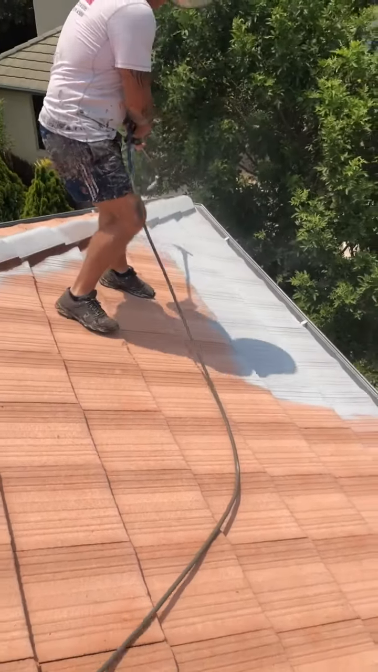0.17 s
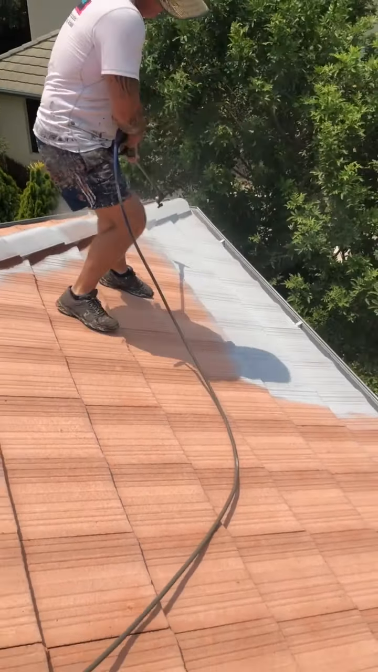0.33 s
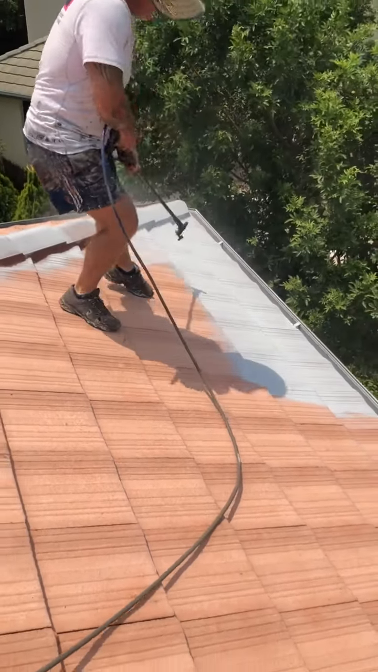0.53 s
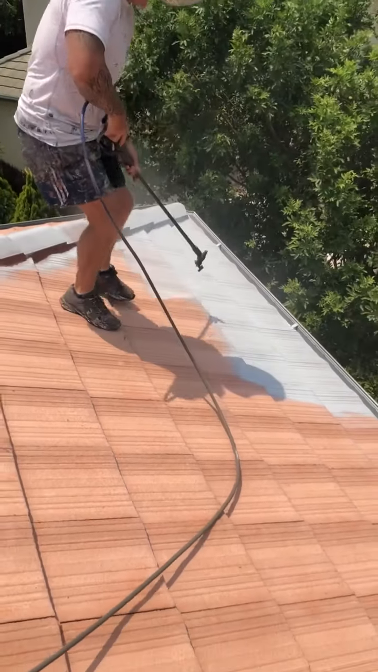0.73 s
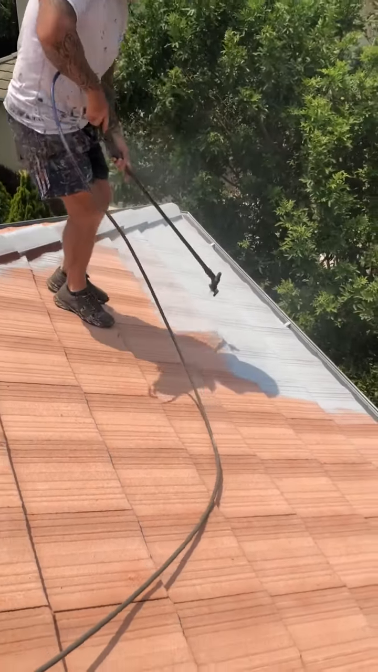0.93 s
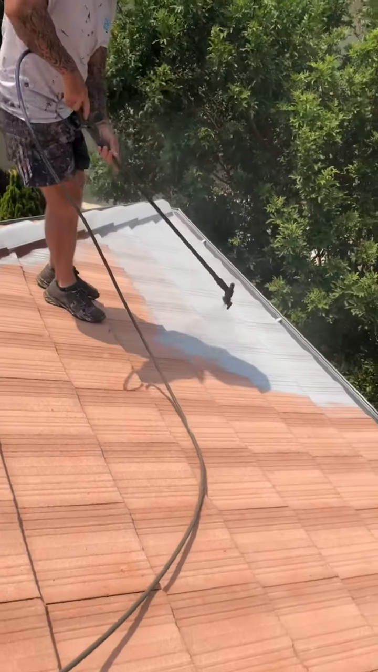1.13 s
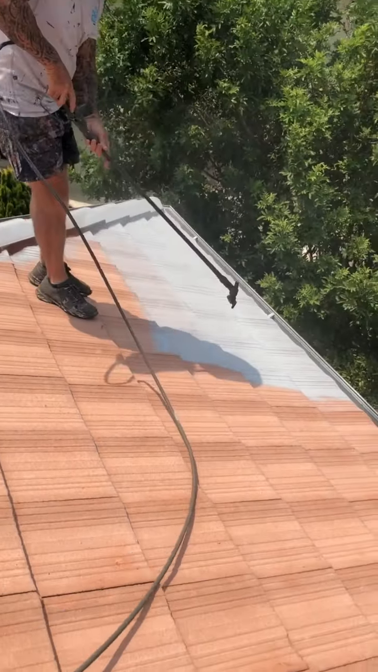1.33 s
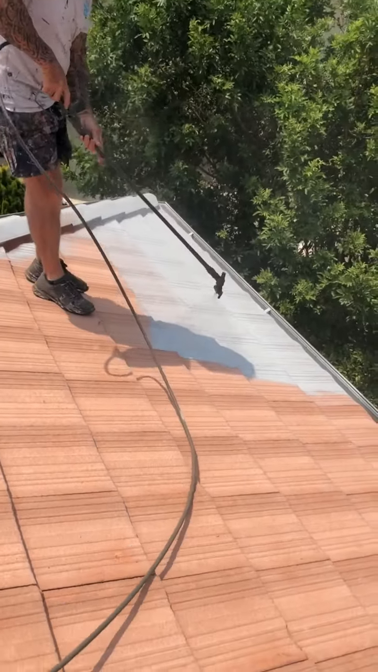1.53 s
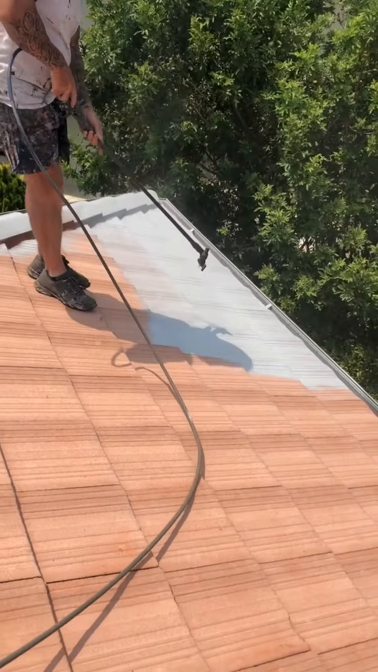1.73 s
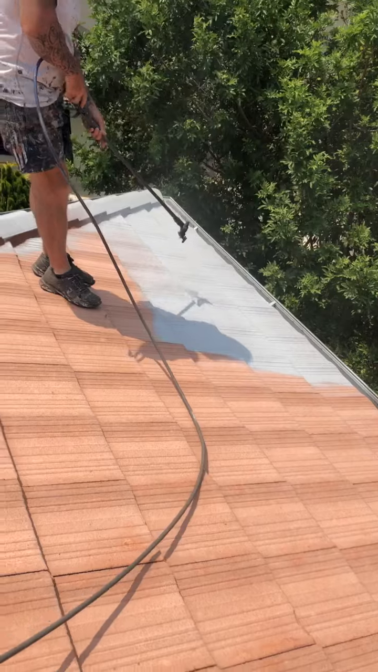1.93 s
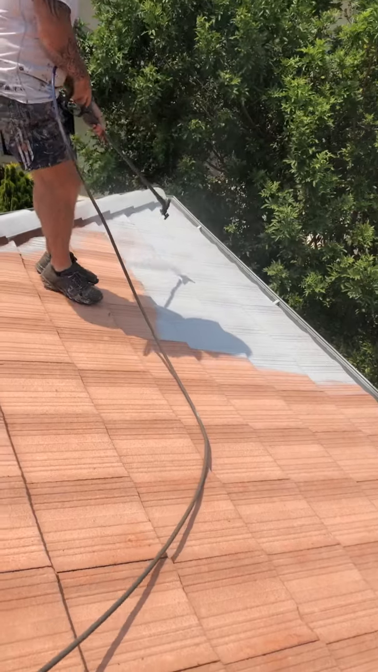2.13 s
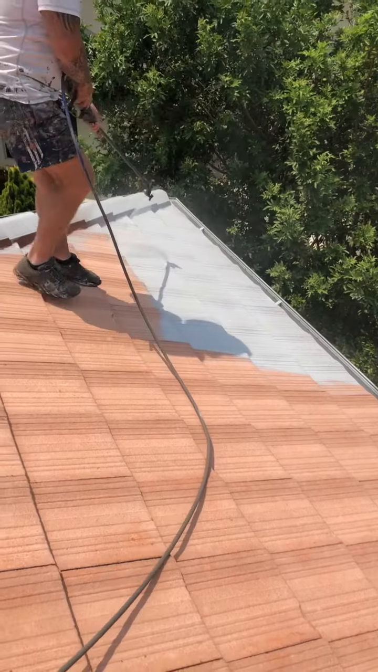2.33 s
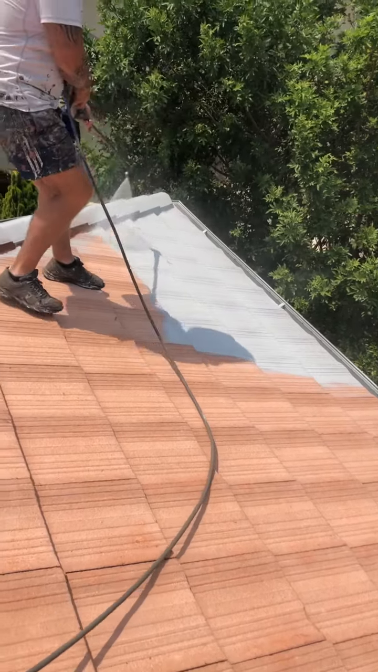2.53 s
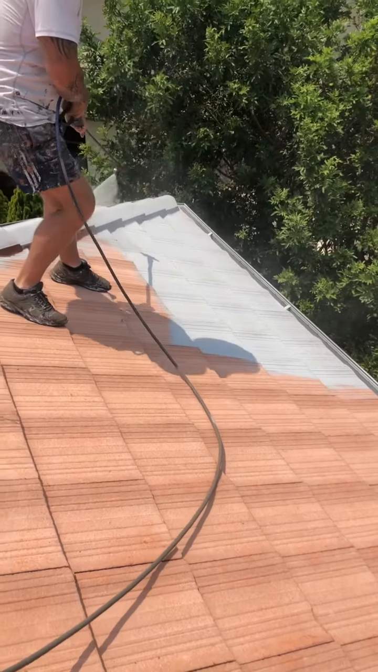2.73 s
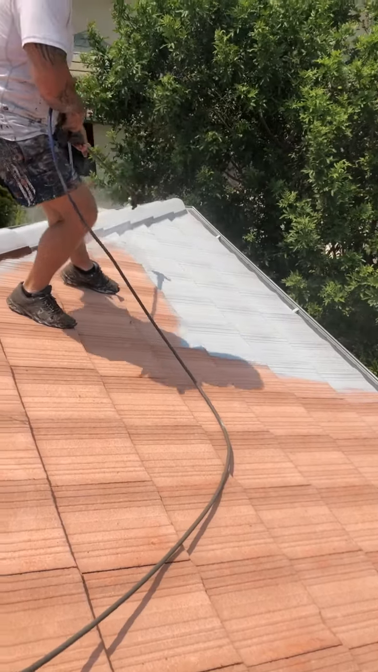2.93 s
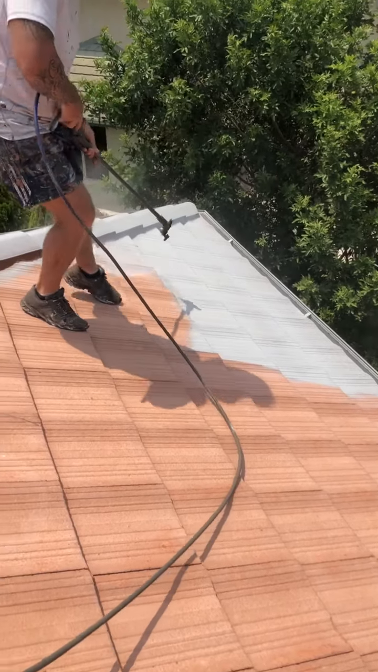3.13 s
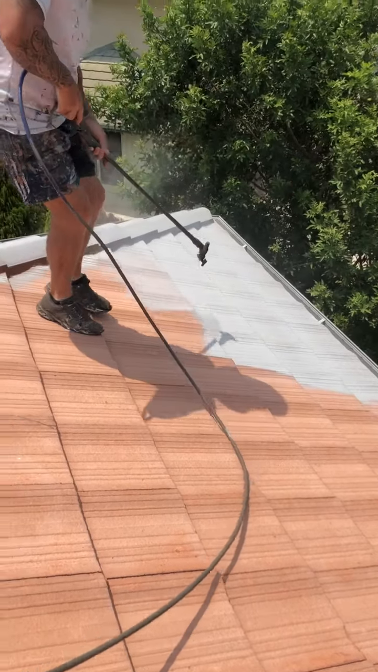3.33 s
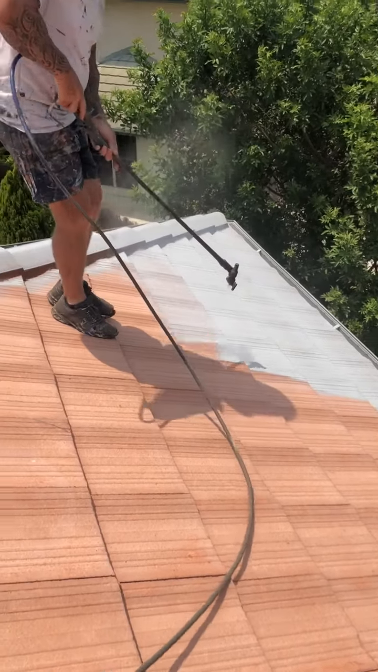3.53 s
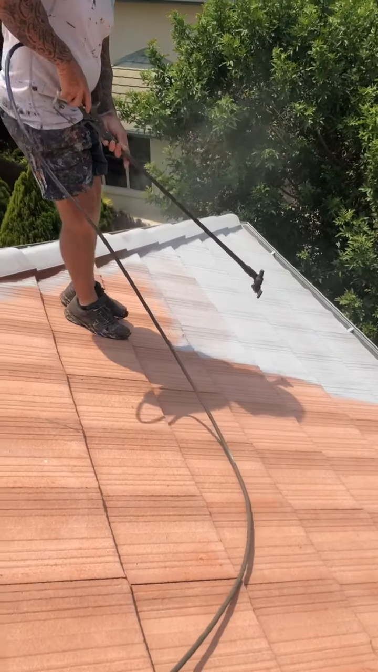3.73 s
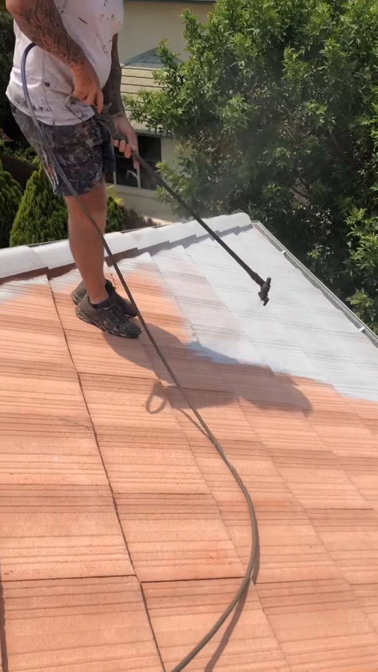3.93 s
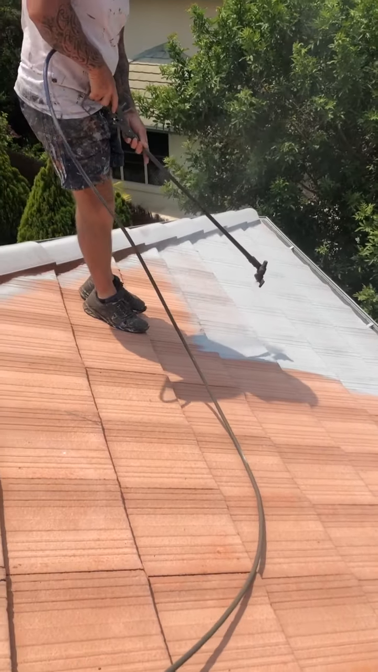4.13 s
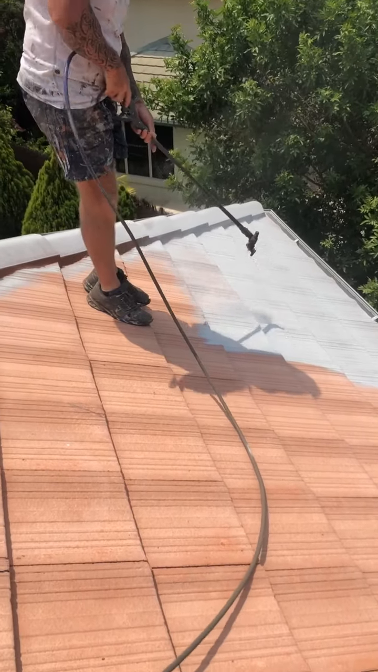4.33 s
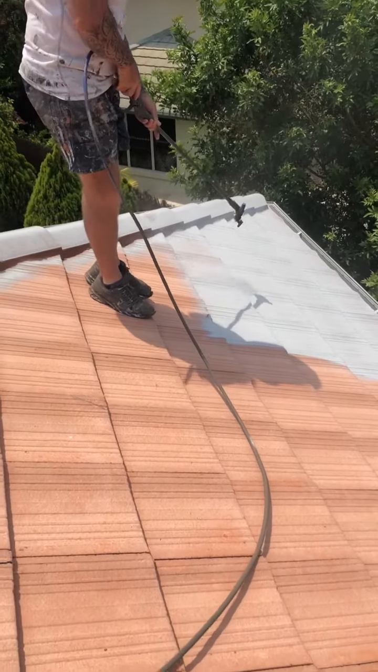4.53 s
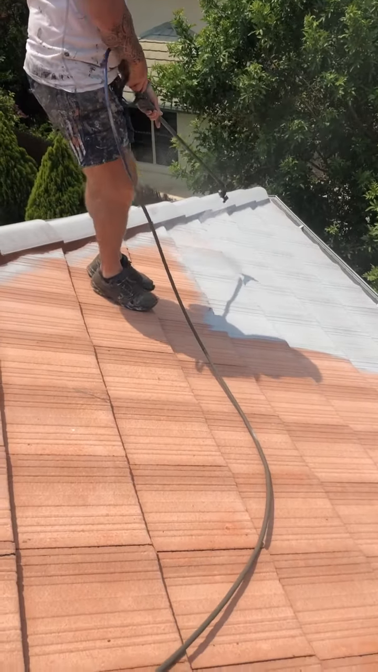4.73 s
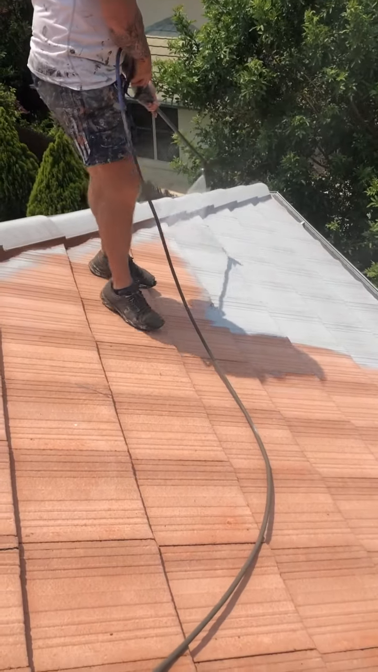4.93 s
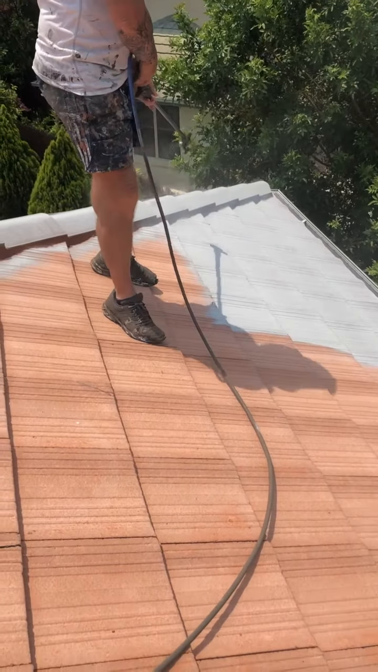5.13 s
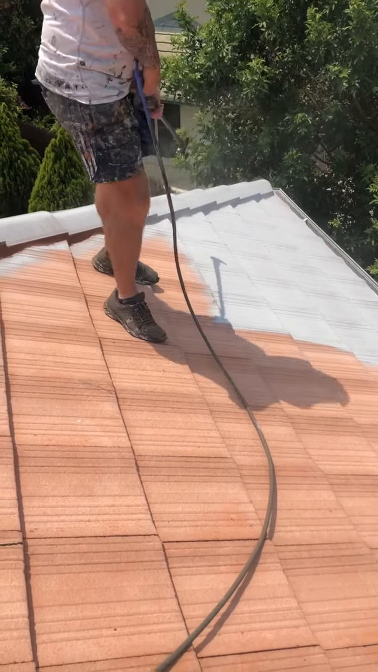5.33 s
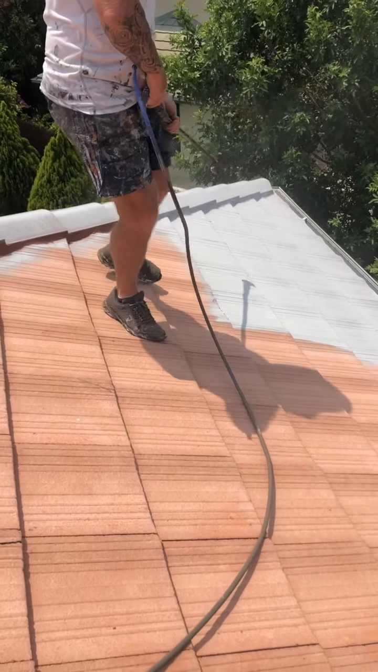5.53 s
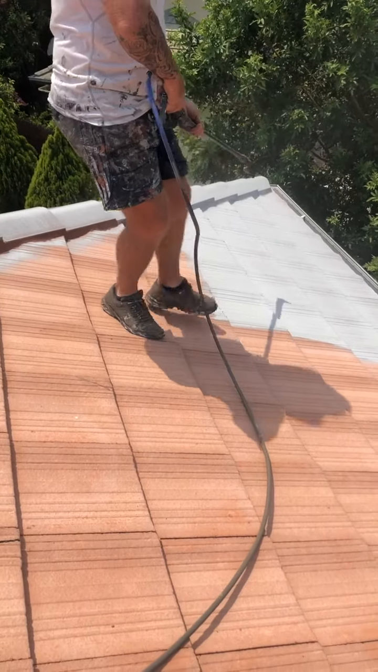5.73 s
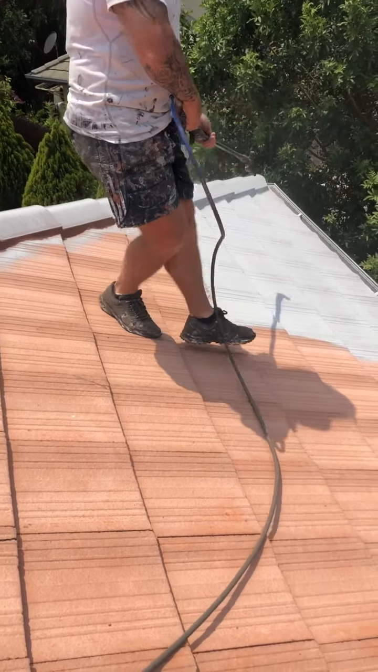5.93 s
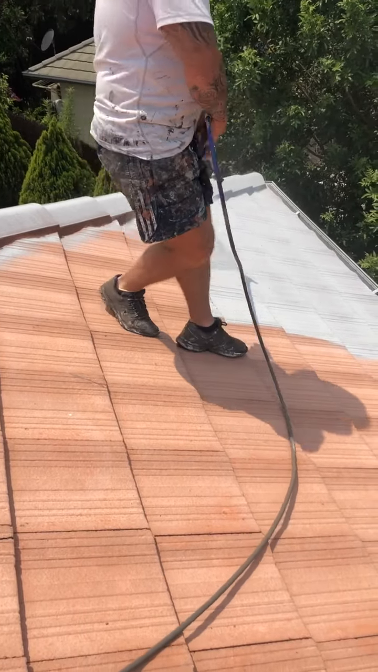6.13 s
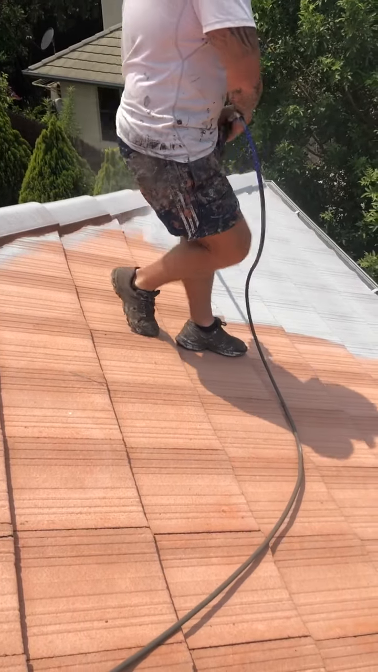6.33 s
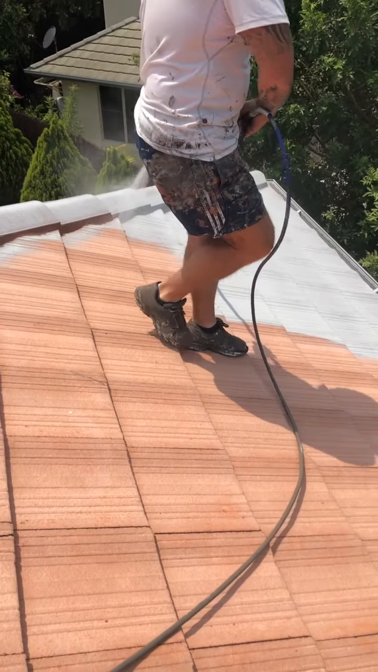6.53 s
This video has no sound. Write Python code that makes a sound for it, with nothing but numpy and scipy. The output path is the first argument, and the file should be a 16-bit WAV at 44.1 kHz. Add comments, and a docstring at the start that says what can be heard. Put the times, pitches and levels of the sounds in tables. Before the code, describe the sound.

Outdoor mono sound from a microphone a few metres from the sprayer: bright, fizzy hiss in successive passes, subtly sweeping in tone from reflections off the tiles. Dull muffled thumps and brief rumble come irregularly underneath, with quiet traffic and high insect shimmer behind. A pause of nearly a second reveals crunching grit, ringing tile knocks and cicada clicks before spraying resumes.

```python
"""An airless spray gun paints a tiled roof outdoors, a few metres from the microphone.
One pass is already hissing; four more passes of shaped noise follow closely, the roof echo combing each sweep.
Under them are low thumps with soft rumble, distant traffic noise and a near cicada's filtered clicks.
Then a longer pause bares the cicada and traffic; grit crunches and loose tiles ring as noise-driven modes.
A last pass starts over the tiles and is still hissing at the end."""
import sys
import numpy as np
from scipy import signal
from scipy.fft import rfft, irfft, next_fast_len
from scipy.io import wavfile
from scipy.ndimage import uniform_filter1d, map_coordinates

SR = 44100
rng = np.random.default_rng(int(sys.argv[2]) if len(sys.argv) > 2 else 0)


def transcribe(signal):
    """Save signal, clipped to [-1, 1], as a 16-bit WAV file at the path in sys.argv[1]."""
    frames = np.atleast_2d(signal).T
    limited = np.clip(frames, -1, 1)
    pcm = np.round(limited * 32767).astype(np.int16)
    wavfile.write(sys.argv[1], SR, pcm)


N = 290619
TIME = np.arange(N) / SR  # s


def undb(db):
    """Decibels to gain."""
    return 10 ** (np.asarray(db) / 20)


def unit(x):
    """Scale to rms 1."""
    return x / np.sqrt(np.mean(x ** 2))


def colour(x, spectrum, pitch=1):
    """Filter by (frequency [Hz], level [dB]) points, shifted by a pitch factor; the ends fall away."""
    hz, db = np.transpose(spectrum)
    log_hz = np.log(hz)
    f = np.log(np.maximum(np.fft.rfftfreq(len(x), 1 / SR), 1) / pitch)
    outside = np.abs(f - np.clip(f, log_hz[0], log_hz[-1]))
    gain = undb(np.interp(f, log_hz, db) - 20 * outside)
    return irfft(rfft(x) * gain, len(x))


def noise(spectrum, pitch=1):
    """Coloured noise of rms 1."""
    white = rng.standard_normal(next_fast_len(N, True))
    return unit(colour(white, spectrum, pitch)[:N])


def walk(rate):
    """Random levels held 1 / rate s and slewed twice; spread near 1."""
    hold = max(int(SR / rate), 1)
    steps = np.repeat(rng.standard_normal(N // hold + 1), hold)
    return 1.3 * uniform_filter1d(uniform_filter1d(steps, hold), hold)[:N]


def contact(s, decay):
    """A touch that starts at once and dies away exponentially."""
    return (TIME >= s) * np.exp(-np.minimum(np.abs(TIME - s) / decay, 20))


def outdoors(x, wet_db, t60):
    """Add the thin, short scatter from trees and house walls, as a decaying noise tail."""
    t = TIME[:SR // 2]
    tail = rng.standard_normal(len(t)) * np.exp(-np.log(1000) * t / t60)
    return x + undb(wet_db) * signal.fftconvolve(x, tail / np.linalg.norm(tail))[:N]


# spectra of the distant traffic and the far cicadas: (frequency [Hz], relative level [dB])
TRAFFIC = [(25, -32), (40, -13.5), (60, -1.5), (100, -2), (160, 0.5), (260, -1.5), (400, -5), (700, -7),
           (1100, -11.5), (2000, -20), (4000, -24.5), (7500, -34), (16000, -40)]
CHORUS = [(8000, -21), (10000, -6), (11300, -1), (13000, -0.5), (16000, -21)]


def suburb(traffic_db=-48, chorus_db=-63.0, surge_db=0.45, shimmer_db=1.7):
    """Distant traffic surges slowly, and far cicadas shimmer fast in the trees: two noises with moving levels."""
    traffic = noise(TRAFFIC) * undb(traffic_db + surge_db * walk(3.2))
    chorus = noise(CHORUS) * undb(chorus_db + 0.65 * walk(3.1) + shimmer_db * walk(500))
    return traffic + chorus


# spectrum of one tick: (frequency [Hz], relative level [dB])
TICK = [(7000, -37), (9500, -3), (11000, 8), (13500, 3), (16000, -14)]
# the near cicada's calls: (time [s], level [dB], length of the soft ticking before [s], snaps [count])
SNAPS = [(.210, -30, 0.09, 1), (1.373, -29, 0, 4), (2.794, -32, 0, 1), (5.350, -32, 0.05, 1),
         (5.611, -28, .091, 1), (5.846, -28, .085, 1), (6.085, -34, 0.086, 1)]
SNAP_GAP_S = 0.019


def cicada(rib_s=0.0024, tick_s=.0085, tick_db=-8, swell_db=-8):
    """Ribs of the tymbal buckle in turn: soft pairs of ticks swell up to a snap of four."""
    clicks = np.zeros(N)
    for s, db, lead, count in SNAPS:
        for snap in s + SNAP_GAP_S * np.arange(round(count)):
            for rib, rib_db in enumerate([-1, -4, -10, -22]):
                clicks[int((snap + rib * rib_s) * SR)] += undb(db + rib_db)
        for before in np.arange(tick_s, lead, tick_s):
            for rib in range(2):
                jitter = .0003 * rng.standard_normal()  # s
                at = s - before - rib * rib_s * .7 + jitter
                soft_db = tick_db + swell_db * before / lead + 1.7 * rng.standard_normal()
                clicks[int(at * SR)] += undb(db + soft_db)
    ticks = colour(clicks, TICK)
    ticks *= clicks.max() / np.abs(ticks).max()  # keep the peak level through the filter
    return outdoors(ticks, wet_db=-14, t60=.15)


# spectrum of a thump: (frequency [Hz], relative level [dB])
THUMP = [(25, -40), (45, -11.5), (70, -2.5), (115, -2), (200, -10.5), (400, -22), (1000, -39)]
# low thumps: (time of the peak [s], rms level [dB], half length [s])
THUMPS = [(0.891, -42.5, 0.017), (1.065, -46, .014), (1.301, -40.5, 0.0097), (1.319, -46, 0.03),
          (1.573, -43, 0.031), (1.659, -35, 0.027), (1.702, -34.5, 0.028), (1.732, -39, .005),
          (2.616, -38, 0.0093), (2.641, -44.5, 0.033), (2.759, -45, .022), (2.842, -47, 0.041),
          (2.942, -54, 0.079), (4.002, -39.5, .016), (4.034, -34, 0.012), (4.106, -36.5, .009),
          (4.168, -36.5, .009), (4.658, -47, 0.019), (5.525, -47, 0.013), (5.694, -39.5, .012),
          (5.737, -44, 0.032), (5.921, -52.5, 0.032)]
# a thump of this half length has the plain spectrum; pitch rises by this power as it gets shorter
THUMP_HALF_S, THUMP_RISE = 0.018, 0.37
RUMBLE_DB, RUMBLE_S, RUMBLE_PITCH = -13.5, 0.091, 0.76  # level against the thump, decay, pitch factor
SOFT_THUMP_DB, SOFT_THUMP_HALF_S = -51.5, 0.01  # weaker ones come at random


def thumps(count=8):
    """Short dull bursts of noise with a deeper rumble behind them; the sharper ones reach higher."""
    out, rumble_power = np.zeros((2, N))
    t = np.arange(-SR // 8, SR // 8) / SR
    soft_times = rng.uniform(.3, N / SR - .3, count)
    soft = [(s, SOFT_THUMP_DB, SOFT_THUMP_HALF_S) for s in soft_times]
    for s, db, half in THUMPS + soft:
        swell = np.exp(-(t / half) ** 2)
        pitch = (THUMP_HALF_S / half) ** THUMP_RISE
        thump = colour(rng.standard_normal(len(t)) * swell, THUMP, pitch)
        thump *= np.linalg.norm(swell) / np.linalg.norm(thump)
        start = int((s + t[0]) * SR)
        out[start:start + len(t)] += undb(db) * thump
        rumble_power += (undb(db + RUMBLE_DB) * contact(s, RUMBLE_S)) ** 2
    return out + np.sqrt(rumble_power) * noise(THUMP, RUMBLE_PITCH)


# spectrum of grit under a shoe: (frequency [Hz], relative level [dB])
SCRAPE = [(300, -11), (700, 4), (2300, 10.5), (4000, -2), (7000, -22), (14000, -30)]
# a tile's ring: (frequency [Hz], width [Hz], relative level [dB])
TILE = [(715, 130, 2), (990, 99, 3), (1260, 57, 4), (1600, 80, -2), (2190, 130, 9.5), (3170, 17, 8.5),
        (4080, 150, -2), (4660, 200, -5)]
# a loose tile clacks under a shoe: (time [s], grit level [dB], grit pitch [factor], ring drive level [dB])
CLACKS = [(2.766, -44.5, 1.17, -50), (5.167, -40, 1.4, -36), (5.293, -43, 0.31, -62),
          (6.037, -33, 0.8, -40.5), (6.124, -48, 0.54, -51)]
CLACK_DECAY_S, REBOUND_S, REBOUND_DB = 0.0042, 0.0058, -3
# grit crunches under a sole: (time [s], level [dB])
SCUFFS = [(5.459, -50.5), (5.543, -52), (5.599, -51.5), (5.66, -46)]
SCUFF_DECAY_S, SCUFF_PITCH, SCUFF_RING_DB = 0.0064, 1.47, -14
# a tile grinds on its neighbour and sings: (time [s], ring drive level [dB], decay [s])
GRINDS = [(5.983, -44, 0.048), (6.055, -47.5, .1), (6.25, -50, 0.12)]
GRIND_GRIT_DB, GRIND_JUDDER_DB = -8, 0.5


def tiles():
    """Grit scrapes under a shoe, and the tile rings as it rocks, rebounds or grinds on its neighbour."""
    scrape, push = np.zeros((2, N))
    for s, grit_db, pitch, ring_db in CLACKS:
        rebound = undb(REBOUND_DB) * contact(s + REBOUND_S, CLACK_DECAY_S)
        touch = contact(s, CLACK_DECAY_S) + rebound
        scrape += undb(grit_db) * touch * noise(SCRAPE, pitch)
        push += undb(ring_db) * touch
    crunch = sum(undb(db) * contact(s, SCUFF_DECAY_S) for s, db in SCUFFS)
    grind = sum(undb(db) * contact(s, decay) for s, db, decay in GRINDS)
    grind = grind * undb(GRIND_JUDDER_DB * walk(150))
    scrape += (crunch + undb(GRIND_GRIT_DB) * grind) * noise(SCRAPE, SCUFF_PITCH)
    push += undb(SCUFF_RING_DB) * crunch + grind
    t = TIME[:SR // 8]
    ring = np.zeros(len(t))
    for hz, width, db in TILE:
        decay = np.exp(-np.pi * width * t)
        ring += undb(db) * np.sqrt(width) * decay * np.sin(2 * np.pi * hz * t)
    rung = signal.fftconvolve(push * rng.standard_normal(N), ring / np.linalg.norm(ring))[:N]
    return outdoors(scrape + rung, wet_db=-15, t60=.2)


def bow(u, start, middle, end):
    """A smooth arc through three values as u runs from 0 to 1."""
    lift = middle - (start + end) / 2
    return start + (end - start) * u + lift * (1 - (2 * u - 1) ** 2)


# one pass of the wand: (trigger pulled [s], released [s], hiss at the start [dB], mid-pass [dB],
# at the end [dB], fan against the hiss [dB], spatter when the hiss is at SPATTER_AT_DB [dB])
PASSES = [ (-.1, 0.191, -41, -41.5, -45.5, -6, -48), (0.27, 1.369, -48, -38, -34, -7, -47.5),
          (1.453, 2.718, -34.5, -36.5, -44, -7.5, -48.5), (2.815, 3.81, -44.5, -37.5, -34.5, -6.5, -46.5),
          (3.934, 5.188, -34, -36, -40.5, -7.5, -47.5), (6.11, 6.7, -42.5, -42.5, -42, -2, -43.5), ]
# lag of the roof reflection in each pass, as the tip dips and lifts: (start [ms], mid-pass [ms], end [ms])
SWINGS = [(0.94, 0.71, 0.77), (.68, .475, 0.765), (0.78, 0.564, 0.684), (0.71, 0.6, 0.86),
          (0.76, 0.616, 0.75), (0.75, 0.425, 0.18)]
# the flat fan turns and the hiss flares or ducks:
# (time [s], half length [s], jet change [dB], fan change [dB], spatter change [dB])
FLARES = [(1.188, .045, 3.5, 2.5, -1), (1.296, .05, -2.5, 2.5, -0.5), (1.62, 0.11, -1, 5, 1.5),
          (1.717, 0.055, 3.5, -0.5, -1.5), (2.48, 0.14, -1, 6, -1), (3.533, 0.08, 2.5, 0.5, 0.5),
          (3.735, 0.033, 2, 1, 0.5), (3.96, .04, 0.5, 3.5, 0.5), (4.978, 0.11, 0, 5, -2),
          (6.445, .04, -3, -1.5, 3.5), (6.54, 0.062, -2, 0.5, -3)]
VALVE_S = .008  # time the gun's needle takes to open or shut
FAN_TILT_DB = 2.5  # the fan gains this at both ends of a pass, where the wand tilts
SPATTER_SHARE, SPATTER_AT_DB = 0.4, -38  # share of the hiss's swell that the spatter follows, from this level


def wand():
    """Each pass is one arc of the arm: it gives the valve opening, three levels and the reflection's lag."""
    valve, jet_db, fan_db, spatter_db, lag_ms = np.zeros((5, N))
    for (on, off, start, middle, end, fan, spatter), swing in zip(PASSES, SWINGS):
        opening = np.clip(np.minimum(TIME - on, off - TIME) / VALVE_S + .5, 0, 1)
        held = opening > 0
        u = (TIME[held] - on) / (off - on)  # progress through the pass
        hiss = bow(u, start, middle, end)
        valve += opening
        jet_db[held] = hiss
        fan_db[held] = hiss + fan + FAN_TILT_DB * (2 * u - 1) ** 2
        spatter_db[held] = spatter + SPATTER_SHARE * (hiss - SPATTER_AT_DB)
        lag_ms[held] = bow(u, *swing)
    for s, half, jet, fan, spatter in FLARES:
        facing = np.exp(-((TIME - s) / half) ** 2)
        jet_db += jet * facing
        fan_db += fan * facing
        spatter_db += spatter * facing
    return valve, jet_db, fan_db, spatter_db, lag_ms


def roof_bounce(x, lag_ms, strength=0.22, turn_rad=1.33):
    """Add the reflection off the tiles, turned in phase; its changing lag sweeps the comb."""
    lag = lag_ms * SR / 1000  # samples
    turned = np.real(signal.hilbert(x) * np.exp(1j * turn_rad))
    echo = map_coordinates(turned, [np.arange(N) - lag], order=3)
    return (x + strength * echo) / np.sqrt(1 + strength ** 2)


# spectra of the hiss at the tip, the fan of mist and the spatter: (frequency [Hz], relative level [dB])
JET = [(4000, -36), (6000, -15), (7200, -3.5), (8700, 0.5), (10000, -0.5), (12000, -2), (14000, -7.5),
       (16000, -13.5)]
FAN = [(2000, -32), (3000, -9), (3600, -7), (4600, 2.5), (6300, 2), (7500, -2), (10000, -6)]
SPATTER = [(300, -12), (800, -5), (1400, 0.5), (1850, -1), (2150, 0), (2450, -2), (3100, 3), (4000, 2),
           (6000, -11)]


def spray(flutter_db=0.59, droplets_db=3.5, tremor_db=0.56, patchy_db=0.5):
    """The jet hisses at the tip, the fan breaks into mist, and droplets spatter on the tiles."""
    valve, jet_db, fan_db, spatter_db, lag_ms = wand()
    jet = undb(jet_db + tremor_db * walk(18)) * noise(JET)
    fan = undb(fan_db + tremor_db * walk(12)) * noise(FAN)
    drops = rng.standard_normal(N) * undb(droplets_db * rng.standard_normal(N))
    spatter = undb(spatter_db + patchy_db * walk(14)) * unit(colour(drops, SPATTER))
    # the sheet of paint flaps as it tears up
    flow = valve * undb(flutter_db * walk(70))
    near = roof_bounce(flow * (jet + fan), lag_ms) + flow * spatter
    return outdoors(near, wet_db=-16, t60=.33)


def scene():
    """Everything reaches one microphone, the same in both channels."""
    mono = suburb() + cicada() + thumps() + tiles() + spray()
    return np.array([mono, mono])


TOP_HZ = 15850


def record(dry):
    """The recorder cuts the top steeply, with an elliptic low-pass."""
    low_pass = signal.ellip(12, .1, 80, TOP_HZ, fs=SR, output="sos")
    return signal.sosfilt(low_pass, dry)


dry = scene()
out = record(dry)
transcribe(out)
```